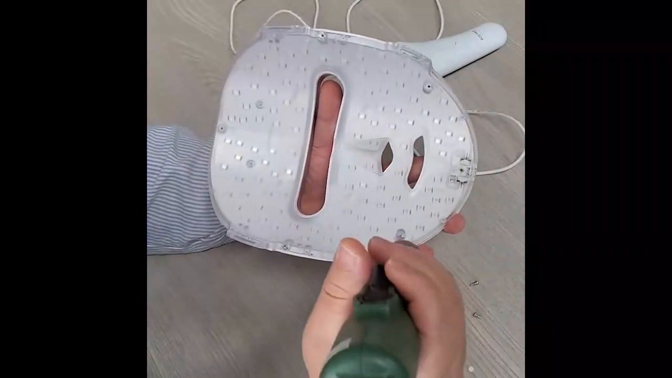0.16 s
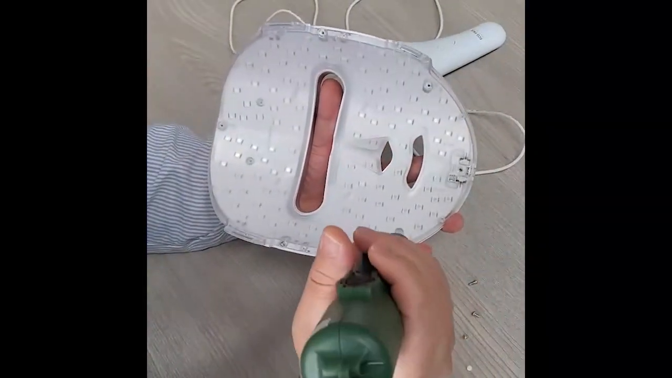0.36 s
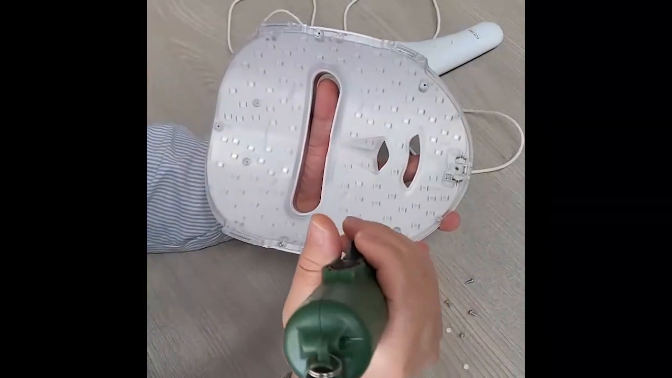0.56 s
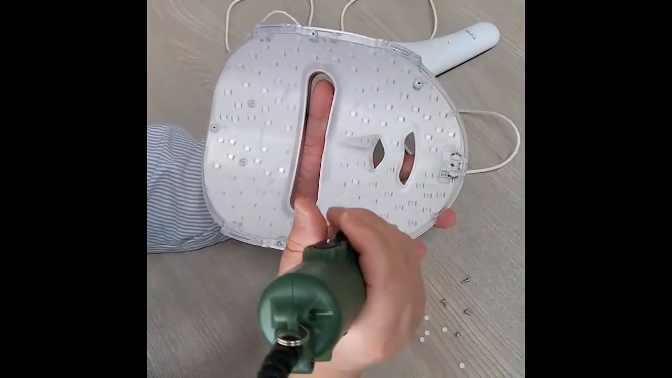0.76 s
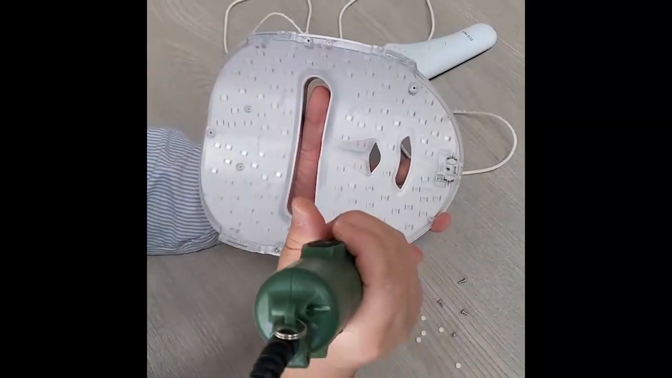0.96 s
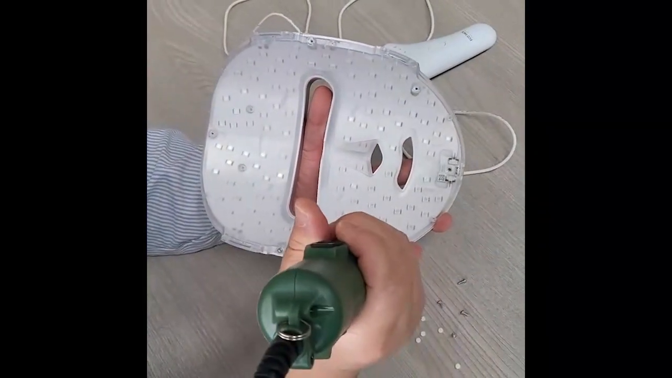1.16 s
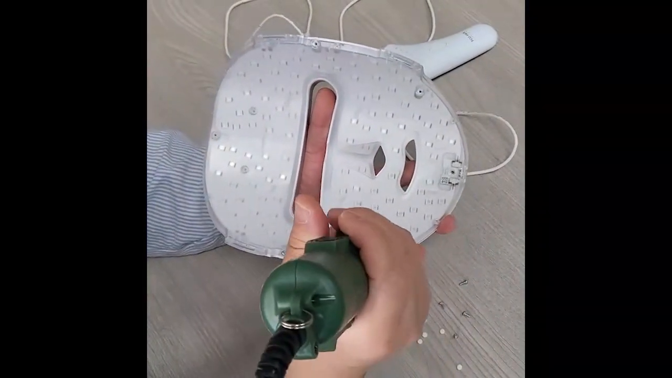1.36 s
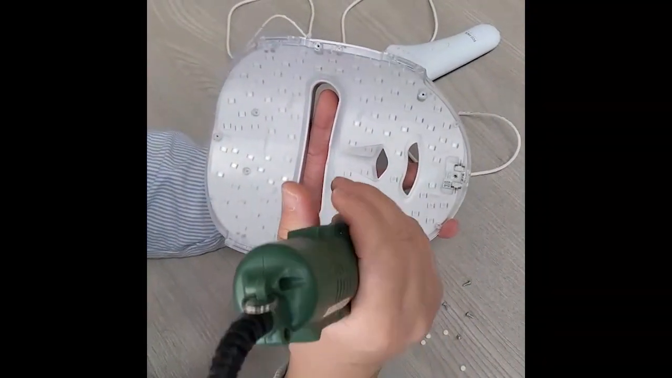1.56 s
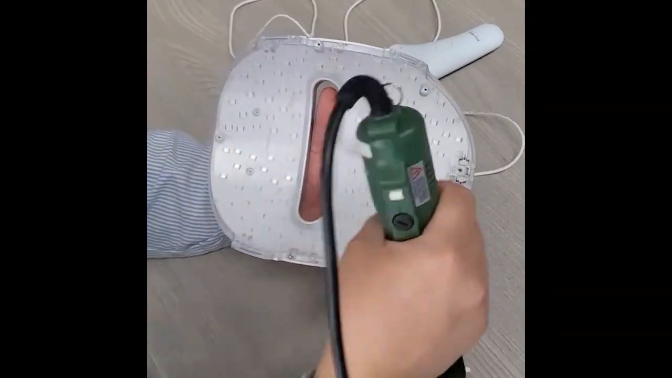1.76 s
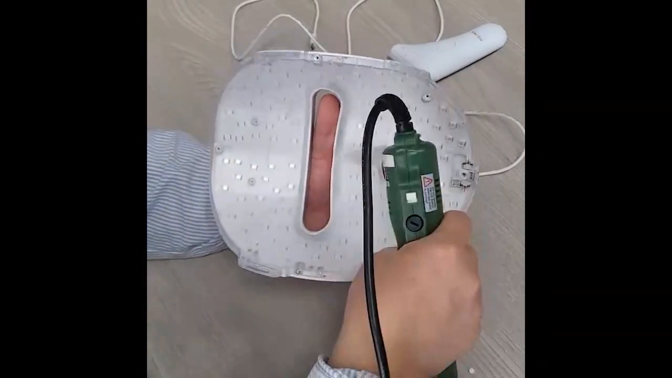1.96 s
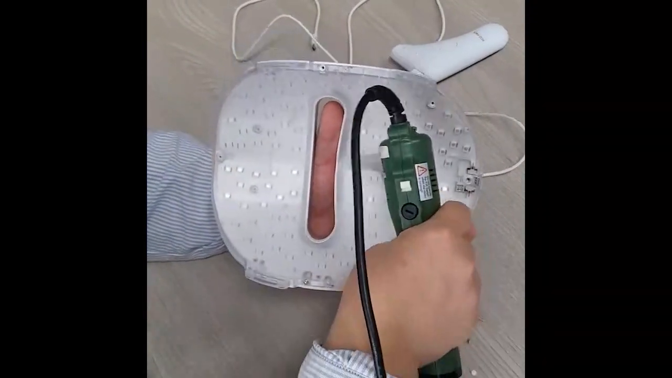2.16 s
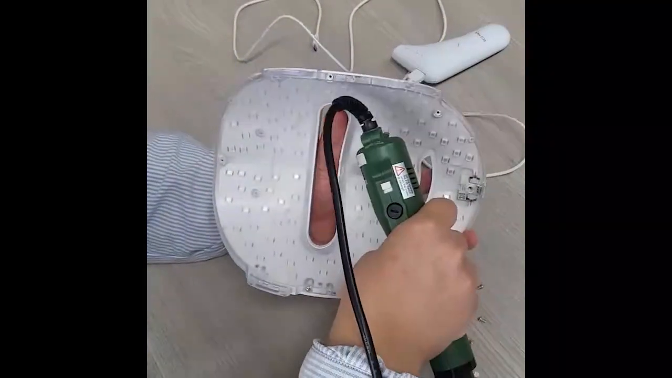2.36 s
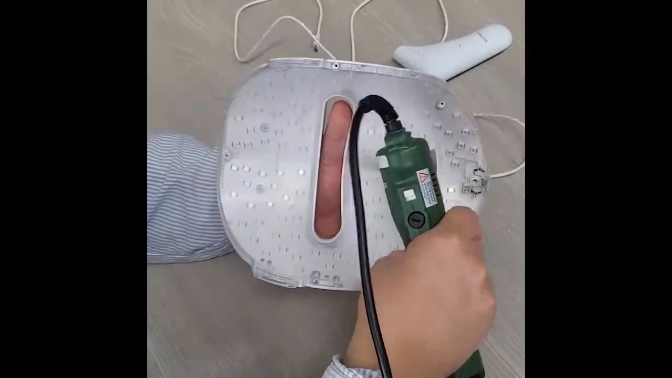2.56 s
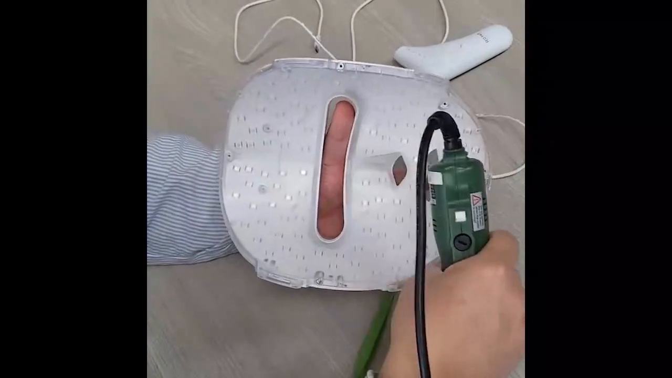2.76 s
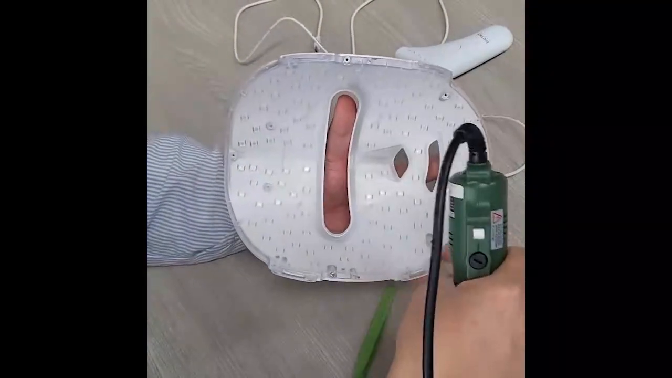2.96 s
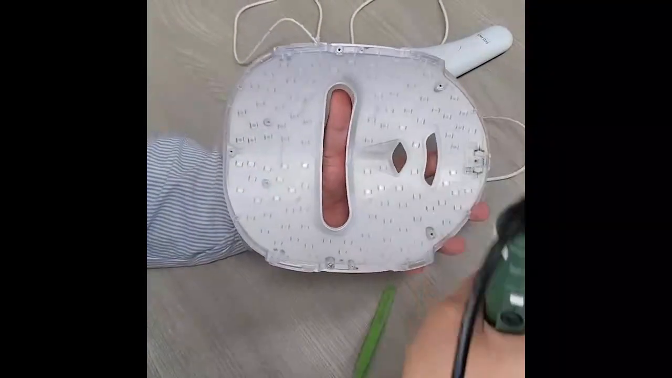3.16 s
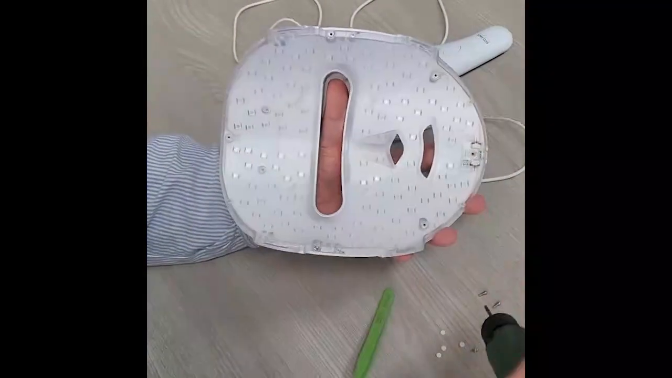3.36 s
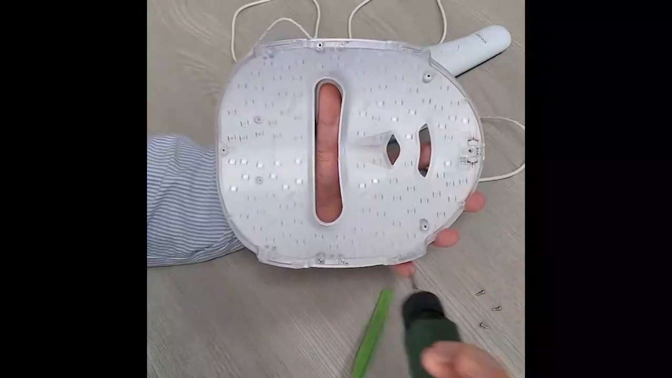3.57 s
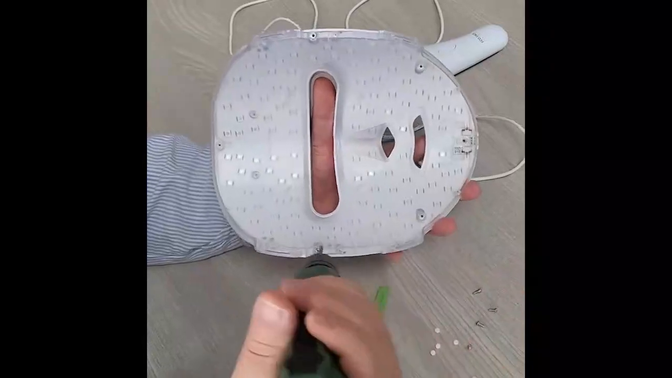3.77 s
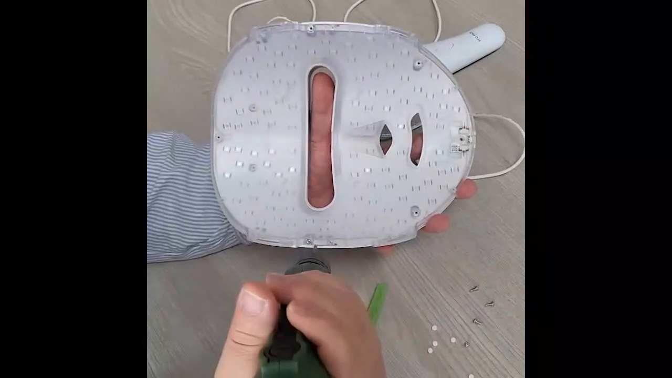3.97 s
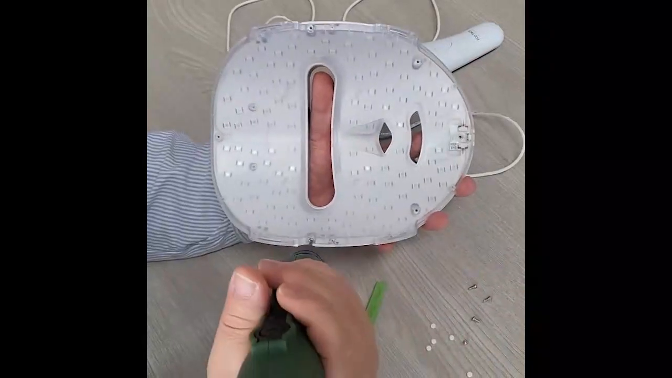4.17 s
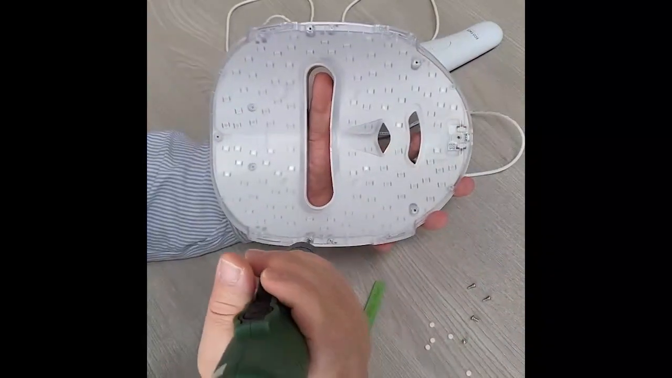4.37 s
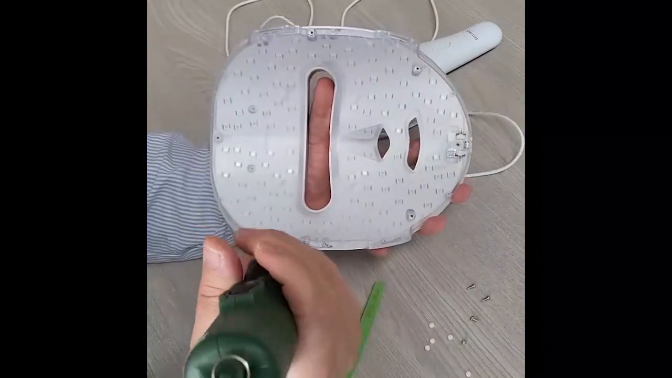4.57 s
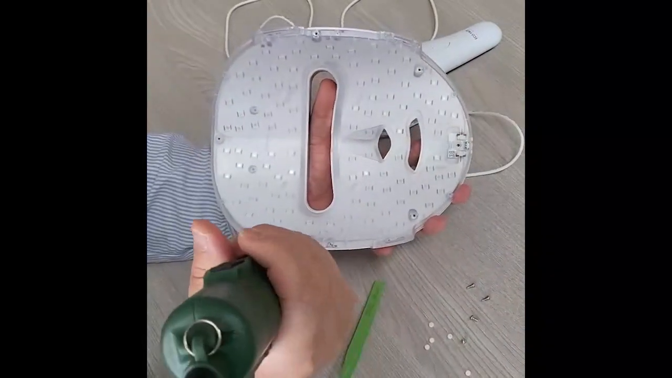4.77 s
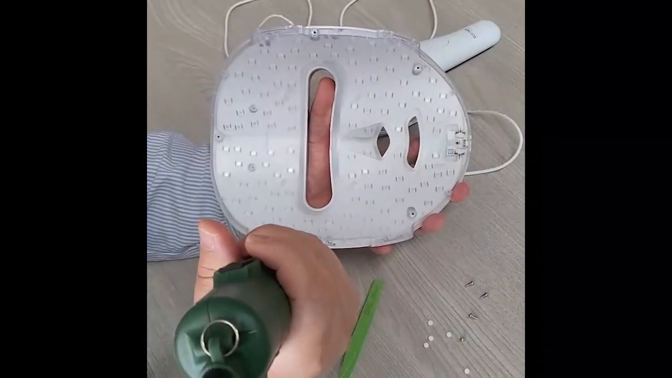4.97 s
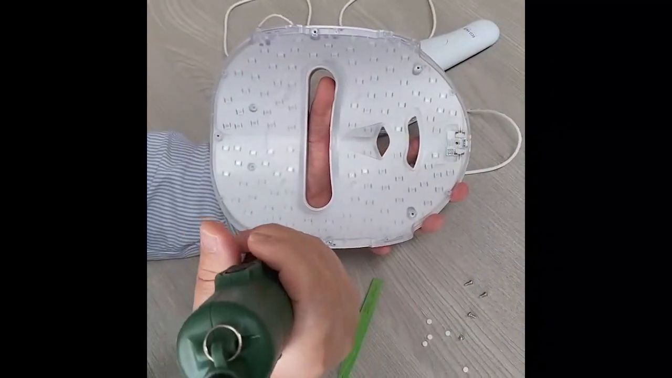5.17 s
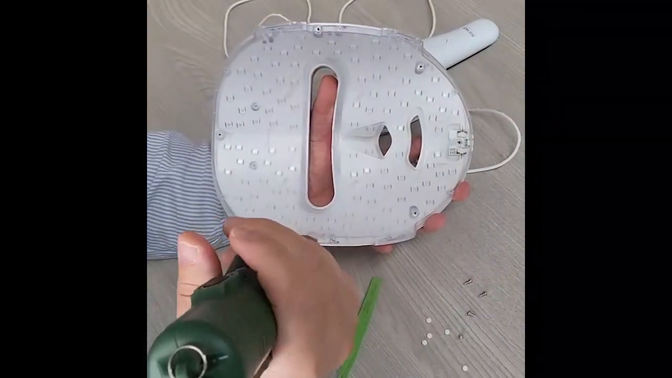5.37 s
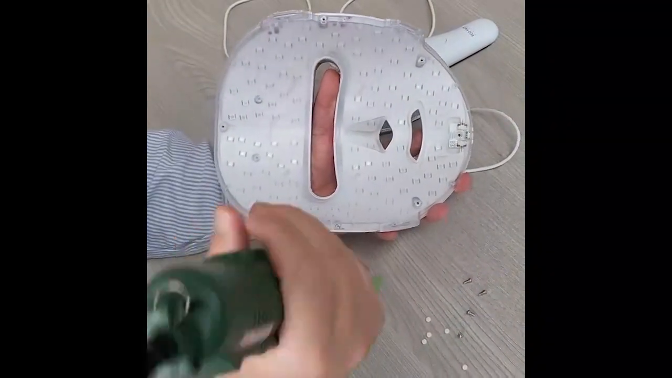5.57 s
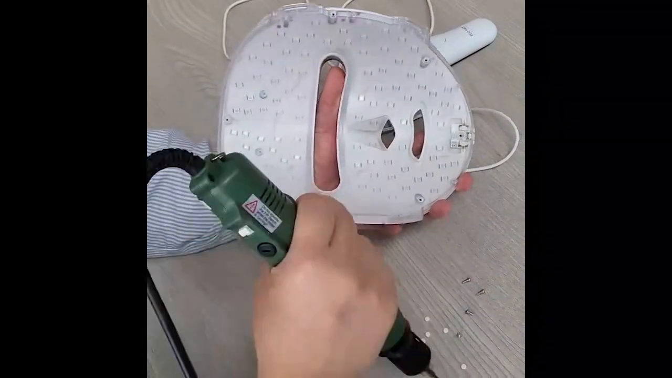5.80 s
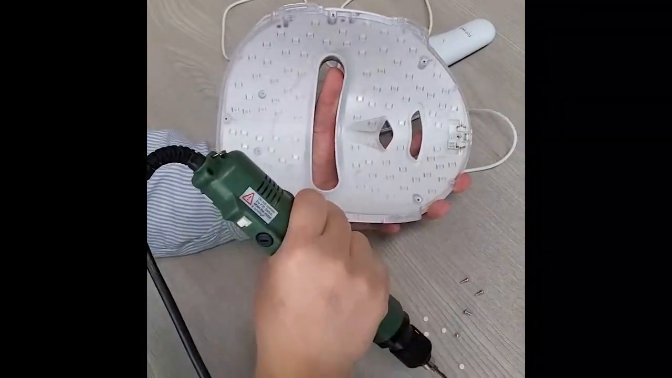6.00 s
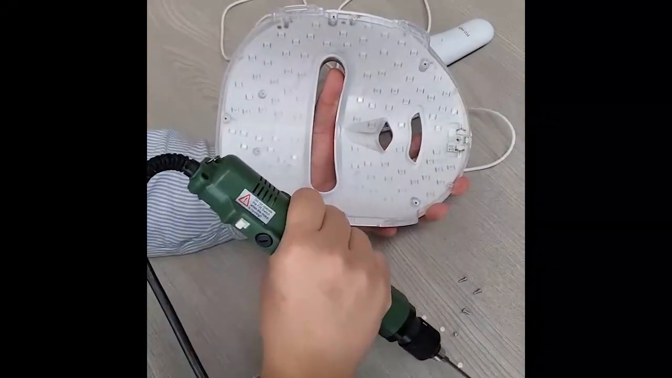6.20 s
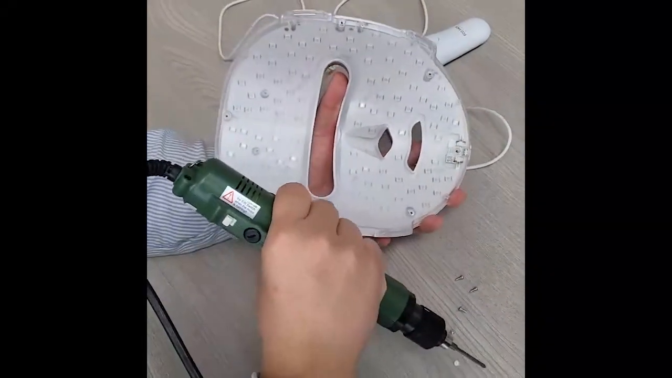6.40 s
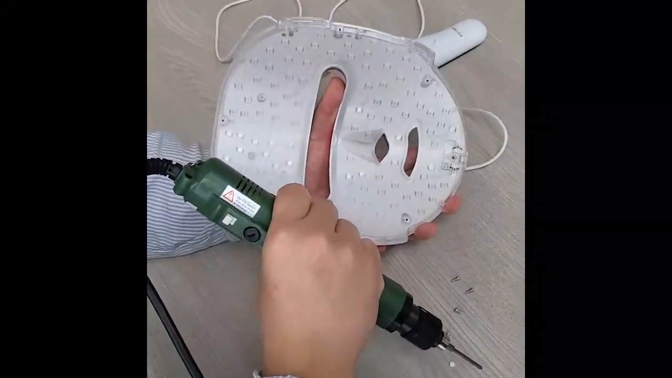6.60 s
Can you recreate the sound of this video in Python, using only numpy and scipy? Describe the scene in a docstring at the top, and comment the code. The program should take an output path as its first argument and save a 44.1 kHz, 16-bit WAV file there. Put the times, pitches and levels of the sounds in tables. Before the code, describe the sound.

Light taps on a hollow plastic shell, two brief power screwdriver runs that each start with a knock, and handling noise between.

```python
"""Close to the microphone, on a table in a small room with a low, beating hum: a hollow plastic mask.
The bit of a small corded screwdriver taps about for a screw head, ringing the shell. At 1 s the motor
kicks the screw loose with a knock, whines up to speed and coasts down. Tool and cord click and drag
over the mask, and the bit taps for a second screw. Near 5 s that one is backed out too, over a faint
squeak; the motor runs down and a last soft rub and click follow."""
import sys
import numpy as np
from scipy import signal
from scipy.fft import rfft, irfft, next_fast_len
from scipy.io import wavfile
from scipy.ndimage import uniform_filter1d, map_coordinates

SR = 44100
rng = np.random.default_rng(int(sys.argv[2]) if len(sys.argv) > 2 else 0)


def generate_wav(sig):
    """Save sig (samples, or channels by samples) to the path in sys.argv[1] as 16-bit PCM at SR."""
    pcm = np.round(np.clip(np.atleast_2d(sig).T, -1, 1) * 32767).astype(np.int16)
    wavfile.write(sys.argv[1], SR, pcm)


N = 292824
TIME = np.arange(N) / SR
BARS = 12  # on the motor's commutator


def amp(db):
    """Decibels to gain."""
    return 10 ** (np.asarray(db) / 20)


def unit(x):
    """x at rms 1."""
    return x / np.sqrt(np.mean(x ** 2) + 1e-20)


def along(points, hz):
    """(f/Hz, value) points read on a log axis."""
    f, v = np.transpose(points)
    return np.interp(np.log(hz + 1), np.log(f + 1), v)


def wobble(rate):
    """A smooth random curve, rate knots a second."""
    return map_coordinates(rng.standard_normal(int(N * rate / SR) + 4), [TIME * rate])


def filtered(x, response):
    """x times a response of frequency."""
    n = x.shape[-1]
    m = next_fast_len(n + 8192)
    return irfft(rfft(x, m) * response(np.fft.rfftfreq(m, 1 / SR)), m)[..., :n]


def coloured(x, spectrum, size=2048):
    """x through a minimum-phase filter with the (f/Hz, level/dB) shape, at rms 1."""
    cepstrum = irfft(np.log(amp(along(spectrum, np.fft.rfftfreq(size, 1 / SR)))))
    cepstrum[1:size // 2] *= 2
    cepstrum[size // 2 + 1:] = 0
    impulse = irfft(np.exp(rfft(cepstrum)))
    return unit(signal.fftconvolve(np.atleast_2d(x), impulse[None], axes=1)[:, :x.shape[-1]])


def grains(rate, spread_db):
    """Tiny impacts of uneven size, rate a second."""
    hits = rng.random(N) < rate / SR
    return unit(hits * rng.standard_normal(N) * amp(spread_db * rng.standard_normal(N)))


def burst(colour, rise, t60):
    """Stereo noise that starts sharply and dies at once."""
    t = np.arange(SR // 2) / SR
    envelope = (1 - np.exp(-t / rise)) * amp(-60 * t / t60)
    noise = coloured(rng.standard_normal((2, len(t))) * envelope, colour)
    return noise * np.sqrt(np.mean(envelope ** 2))


def swell(s, rise, t60):
    """An envelope that builds for rise seconds up to time s and then dies away."""
    return np.clip(1 + (TIME - s) / rise, 0, 1) ** 2 * amp(-60 * np.maximum(TIME - s, 0) / t60)


def patchy(x, depth_db):
    """The colour of x flickers in small patches of time and frequency."""
    z = signal.stft(x, nperseg=512)[2]
    field = uniform_filter1d(rng.standard_normal(z.shape[-2:]), size=6, axis=0)
    field = uniform_filter1d(field, size=7, axis=1)
    return signal.istft(z * amp(depth_db * unit(field)), nperseg=512)[1][..., :N]


def add(track, s, sound):
    """Mix a stereo sound into the track at time s."""
    part = track[:, max(round(s * SR), 0):][:, :sound.shape[1]]
    part += sound[:, :part.shape[1]]


def in_room(x, wet_db, pan_db, lead_s=.0001, early_db=-3, early_t60=0.21, shared=0.31):
    """x at a close microphone pair, with quick reflections off table and hands and the room's tail."""
    # the small room's decay: f/Hz, t60/s
    room = [(200, 0.52), (530, 0.24), (1300, 0.24), (3700, 0.17), (8000, 0.3), (15000, 0.049)]
    hz, t, noise = signal.stft(rng.standard_normal((3, SR // 2)), SR, nperseg=256)
    decay = amp(-60 * t / along(room, hz)[:, None]) + amp(early_db - 60 * t / early_t60)
    tails = signal.istft(noise * decay, SR, nperseg=256)[1]
    tails *= 1 - np.exp(-np.arange(tails.shape[1]) / SR / 0.00069)
    tails = tails[:2] + shared * tails[2]
    tails /= np.linalg.norm(tails, axis=1, keepdims=True)
    sides = np.array([[1], [-1]])
    direct = filtered(x, lambda f: np.exp(1j * np.pi * f * lead_s * sides))  # reaches the left first
    echo = signal.fftconvolve(np.atleast_2d(x), tails, axes=1)[:, :x.shape[-1]]
    return amp(sides * pan_db / 2) * (direct + amp(wet_db) * echo)


def room_tone(noise_db=-66, hum_pan_db=-2):
    """Faint, steady background noise, and a low hum whose close tones beat."""
    # spectrum of the background noise: f/Hz, level/dB
    noise_colour = [(12, -63), (20, -35), (41, -10.5), (65, -10.5), (88, -25.5), (119, -12), (145, -21.5),
                    (233, -23.5), (375, -34.5), (443, -32.5), (496, -49.5), (637, -37), (733, -44.5),
                    (10100, -48), (15800, -58.5)]
    # how alike the background noise is at left and right: f/Hz, likeness
    likeness = [(60, 0.59), (180, 0.66), (550, 0.22), (1650, 0.08), (4970, 0.44), (15000, 1)]
    # tones of the hum: f/Hz, level/dB
    hum_tones = [(61, -59.5), (47.5, -67), (60, -82), (126.4, -73.5)]

    def mid_and_side(hz):
        width = np.arccos(np.clip(along(likeness, hz), 0, 1)) / 2
        return amp(along(noise_colour, hz)) * [np.cos(width), np.sin(width)]

    mid, side = filtered(rng.standard_normal((2, N)), mid_and_side)
    noise = amp(noise_db) * unit(np.array([mid + side, mid - side]))
    hum = sum(amp(db + 0.32 * wobble(1)) * np.sin(2 * np.pi * hz * TIME + .5 * wobble(15))
              for hz, db in hum_tones)
    return noise + hum * amp([[hum_pan_db / 2], [-hum_pan_db / 2]])


def clicks():
    """Small hard parts of switch and cord snap with a bright tick and almost no ring."""
    # the snaps: t/s, level/dB, clack below 2.3 kHz/dB, fizz above 10 kHz/dB, left-right/dB
    snaps = [(0.026, -33, 2, -5, -2.5), (.979, -26.5, -7, -5, 3), (1.992, -29, -6.5, -6.5, 0),
             (2.696, -20.5, 3.5, -4, -1.5), (2.857, -17, -16, 5, 1.5), (3.021, -19, -25, 6, 1),
             (3.125, -24.5, -7, 4, -2), (3.216, -28, -31, 6, -1), (3.572, -44, 9, -5, -6.5),
             (4.907, -27, -1.5, -7, -1.5), (4.923, -22.5, -1, -21, -1), (6.196, -50.5, 9.5, -13, -0.5)]
    # spectrum of a snap: f/Hz, level/dB
    snap_colour = [(200, -18), (750, -6.5), (1400, -1), (2300, 4.5), (3400, -3.5), (7000, -0.5),
                   (10500, -5), (15000, -9.5)]
    out = np.zeros((2, N))
    for s, db, clack_db, fizz_db, pan_db in snaps:
        tilt = [(2300, clack_db), (3400, 0), (7000, 0), (10500, fizz_db)]
        colour = [(hz, level + along(tilt, hz)) for hz, level in snap_colour]
        tick = amp(db) * burst(colour, rise=0.00094, t60=0.0091)
        add(out, s, in_room(tick, wet_db=2, pan_db=pan_db))
    return out


def shell_taps(ring_rise_s=0.00011):
    """Bit and tool ring the mask briefly; each tap has its own brightness and crack."""
    # the blows: t/s, ring/dB, low modes re ring/dB, high modes re ring/dB, crack/dB, left-right/dB
    blows = [(.153, -42.5, -13.5, 0.5, -55, 1), (0.172, -24.5, -4.5, -0.5, -45, -1.5),
             (.178, -18.5, -5, -2.5, -32, -1), (.238, -34.5, -8, -3, -63, -4),
             (.327, -53.5, -12, 6.5, -69, -3), (.545, -39, -12, 3.5, -46, 0.5),
             (.582, -28.5, -10.5, 0.5, -47, -3.5), (.591, -28.5, -11.5, -2, -48, 0),
             (0.636, -42.5, -5.5, 1.5, -55, 0.5), (.668, -31.5, -5, -5, -44.5, -2.5),
             (0.77, -50.5, -6, -9, -63.5, 0), (1.011, -12, -23.5, 4, -14, 0),
             (1.373, -26, -3.5, 2, -45, -2), (1.438, -27.5, -5, -1, -32, -1.5),
             (4.015, -24, -11, -7, -61.5, -5.5), (4.025, -30.5, 2, 0.5, -40.5, -1.5),
             (4.283, -27.5, -9.5, -2.5, -43, -1.5), (4.405, -8.5, -23.5, -9.5, -30, -1),
             (4.521, -46, -3, -2.5, -57.5, -2), (4.748, -60, -6, 1, -72, -14),
             (4.944, -6.5, -9, -1, -26.5, -4.5), (4.951, -13, -15.5, 7, -12.5, 0.5),
             (5.355, -29, -3.5, -15, -30, -1)]
    # modes of the plastic shell: f/Hz, level/dB, t60/s
    shell = [(202, -19.5, 0.031), (275, -13.5, 0.028), (428, -3, 0.02), (556, -2, 0.024),
             (671.5, -3.5, .02), (894, 2, .018), (985, 6, 0.0077), (1245, 1.5, 0.012), (1530, -1.5, 0.014),
             (1580, 2, 0.011), (1874, -3, 0.0074), (2195, -2.5, 0.014), (2520, -9, 0.017),
             (3100, -10.5, 0.0069), (3830, -17.5, 0.015)]
    # spectrum of the contact's crack: f/Hz, level/dB
    crack_colour = [(1530, -32.5), (2600, -4.5), (3160, -7), (5050, -6), (5910, -9.5), (6970, -5.5),
                    (8530, -18), (11400, -21), (15500, -24)]
    out, t = np.zeros((2, N)), np.arange(SR // 2) / SR
    hz, mode_db, t60 = np.transpose(shell)[:, :, None]
    polarity = (-1) ** np.arange(len(hz))[:, None]
    for s, ring_db, low_db, high_db, crack_db, pan_db in blows:
        tilt = [(600, low_db), (950, 0), (1280, 0.0073), (1600, high_db)]
        strike_db = along(tilt, hz) + rng.normal(0, 1, hz.shape)
        pitch = hz * (1 + rng.normal(0, 0.036, hz.shape))  # the grip bends the shell a little
        modes = polarity * amp(mode_db + strike_db - 60 * t / t60) * np.sin(2 * np.pi * pitch * t)
        ring = amp(ring_db) * (1 - np.exp(-t / ring_rise_s)) * modes.sum(axis=0)
        crack = amp(crack_db) * burst(crack_colour, rise=0.00038, t60=.017)
        wet_db = np.interp(ring_db, [-25, -7], [-2.5, -9])  # loud blows face the microphone: drier
        add(out, s, in_room(ring, wet_db, pan_db) + in_room(crack, wet_db=-0.5, pan_db=pan_db))
    return out


def shaft_speed(on, off, tight_hz, top_hz, spin_up_s=.034, loosen_s=.15, coast_s=.75, friction_hz_s=1056):
    """Turns a second: quick spin-up, a slow gain as the screw loosens, then drag and dry friction."""
    driven, free = np.clip(TIME, on, off) - on, np.maximum(TIME - off, 0)
    speed = tight_hz * (1 - np.exp(-driven / spin_up_s))
    speed += (top_hz - tight_hz) * (1 - np.exp(-driven / loosen_s))
    drag = np.exp(-free / coast_s)
    return np.maximum(speed * drag - friction_hz_s * coast_s * (1 - drag), 0)


def brushes(angle, once_a_turn, hiss, sizzle, rasp_db=2.5):
    """Brushes hiss over the commutator's bars; their sparks sizzle above about 8 kHz."""
    # spectrum of the sliding contact: f/Hz, level/dB
    brush_colour = [(1650, -31), (2800, -4), (3080, -9.5), (4260, -8), (4750, -2.5), (5260, -7), (5650, -5),
                    (6630, -2), (7280, -2.5), (8290, -11), (11200, -1), (13700, -5), (14500, -1),
                    (15500, -9), (15800, -28)]
    contact = once_a_turn * (1 + .5 * np.cos(BARS * angle)) * amp(rasp_db * wobble(220))
    noise = coloured(contact * (rng.standard_normal((2, N)) + grains(4000, spread_db=-2)), brush_colour)
    sparks = filtered(noise, lambda f: np.clip((f - 7800) / 1200, 0, 1))
    return hiss * unit(noise - sparks) + sizzle * unit(sparks)


def gear_rattle(once_a_turn, slack):
    """The gears rattle in their casing; the deep part needs speed or load and fades as they go slack."""
    # spectrum of the gears: f/Hz, level/dB
    gear_colour = [(410, -34), (700, -9), (765, -11), (1000, -2), (1370, -0.5), (1790, -4.5), (2080, 0.5),
                   (3010, -15), (3600, -5.5), (4680, -39.5), (7920, -120)]
    rattle = coloured(once_a_turn * grains(5000, spread_db=2), gear_colour)
    casing = filtered(rattle, lambda f: np.clip((1200 - f) / 200, 0, 1))
    return rattle - slack * casing


def screw_grind(torque, speed_ratio, loosest_s, bite_db=10.5, half_width_s=0.15, uneven_db=3.5):
    """The screw bites in its thread under torque, then grinds again as it wobbles loose."""
    # spectrum of the thread: f/Hz, level/dB
    thread_colour = [(65, -37.5), (110, -6), (189, -12.5), (269, -3), (485, -6.5), (679, -3), (793, -7.5),
                     (1100, -3.5), (1430, -33.5), (2420, -120)]
    bite = amp(bite_db) * torque ** 2
    loose = speed_ratio ** 2 / (1 + ((TIME - loosest_s) / half_width_s) ** 2)
    thread = coloured(grains(1200, spread_db=2), thread_colour)
    return (bite + loose) * amp(uneven_db * wobble(35)) * thread


def motor_whine(speed, angle, coasting):
    """Tones at multiples of the shaft speed; those above the commutator's soften as the shaft slows."""
    # motor tones: multiple of the shaft speed, level under power/dB, level coasting/dB
    orders = [(1.45, 1, -20), (2.9, -9, -25), (3, -16, -9), (4.35, -7, -25), (6, -19, -12), (12, -.5, 2.5),
              (13, -14, -18), (24, -8, -6), (36, -40, -5)]
    # how well the housing radiates them: f/Hz, gain/dB
    housing = [(400, -24), (900, -14), (1300, -4), (2500, -4), (4000, 0), (5500, 1), (7000, 2), (8500, -10),
               (10500, 0), (12500, -2), (15000, -12), (17000, -60)]
    softening_db = 1.4 * np.clip(speed / 210 - 1, -1, 0)
    whine = np.zeros(N)
    for order, driven_db, free_db in orders:
        db = driven_db + (free_db - driven_db) * coasting
        db += along(housing, order * speed) + softening_db * max(order - BARS, 0)
        whine += amp(db + wobble(25)) * np.sin(order * angle)
    return whine


def screwdriver(run, levels, chop=0.31, flutter_db=1.86, attack_s=0.033, quiet_below_hz=126):
    """One run, close up: brushes, gears, screw and whine follow the shaft's speed and load."""
    on, off, _, top_hz = run
    hiss_db, sizzle_db, gear_db, thread_db, loosest_s, pan_db = levels
    speed = shaft_speed(*run)
    speed_ratio = speed / top_hz
    coasting = np.clip((TIME - off) / 0.034, 0, 1)
    torque = (1 - speed_ratio) * (1 - coasting)  # greatest at the start, gone at full speed
    attack = np.clip((TIME - on) / attack_s, 0, 1) ** 2
    pace = (speed / quiet_below_hz) ** 5.1  # the noise fades steeply at low speed
    running = attack * pace / np.hypot(1, pace) * amp(flutter_db * wobble(25))
    blur = (.005 + .009 * coasting) * wobble(300)  # without drive the gears run slack and tones blur
    angle = 2 * np.pi * np.cumsum(speed * (1 + blur)) / SR
    once_a_turn = 1 + chop * np.cos(angle)

    def gain(db, torque_db, coast_db):
        return running * amp(db + torque_db * torque + coast_db * coasting)

    hiss = gain(hiss_db, torque_db=9.5, coast_db=-5.5)
    sizzle = gain(sizzle_db, torque_db=7, coast_db=-5.5)
    gears = gain(gear_db, torque_db=19, coast_db=-4.5)
    noise = brushes(angle, once_a_turn, hiss, sizzle)
    noise += gears * gear_rattle(once_a_turn, slack=coasting * (1 - speed_ratio ** 3))
    noise += running * amp(thread_db) * screw_grind(torque, speed_ratio, loosest_s)
    whine = hiss * (1 - torque) ** 2 * motor_whine(speed, angle, coasting)
    whine = in_room(whine, wet_db=-5.5, pan_db=pan_db, lead_s=.00003)
    noise = in_room(noise, wet_db=-1, pan_db=pan_db, lead_s=.00003)
    return whine + patchy(noise, depth_db=2.8)


def handling():
    """A little to the right, cord and tool bump the hollow shell and stick and slip across it."""
    # slides over the mask: peak t/s, rise/s, t60/s, bump/dB, rub/dB, scrape/dB
    slides = [(2.36, 0.03, 0.16, -66, -65, -73.5), (2.461, 0.016, 0.18, -72, -80, -78.5),
              (2.88, 0.028, 0.2, -40.5, -45.5, -39), (2.934, 0.1, 0.41, -36, -56.5, -69),
              (3.025, 0.017, .4, -50, -60.5, -49), (3.11, 0.035, 0.2, -60.5, -64, -54.5),
              (3.287, 0.12, 0.21, -42.5, -58, -46.5), (3.33, 0.09, 0.12, -61, -62.5, -55),
              (3.49, 0.15, 0.53, -70.5, -71.5, -69), (3.61, 0.081, 0.3, -68.5, -65.5, -70),
              (3.78, 0.024, 0.37, -60.5, -89, -105), (4.167, .018, 0.23, -63.5, -50.5, -73),
              (4.205, .06, 0.16, -69, -53.5, -88), (5.939, 0.075, 0.26, -68, -68, -74.5),
              (6.265, 0.019, 0.29, -62.5, -69.5, -70.5)]
    # spectra of the deep bump, the dull rub and the bright scrape: f/Hz, level/dB
    bump_colour = [(41, -34.5), (80, -14), (114, 3.5), (162, -0.5), (188, -10.5), (284, -4.5), (356, -10),
                   (520, -47.5), (680, -54), (1140, -120)]
    rub_colour = [(200, -26.5), (400, 8), (700, 5), (1000, 0), (1600, -8), (3000, -69.5)]
    scrape_colour = [(600, -71), (1200, 1.5), (1600, -0.5), (2300, -1.5), (3000, -9), (7000, -9),
                     (14000, -33)]
    bump, rub, scrape = sum(amp(db)[:, None] * swell(s, rise, t60) for s, rise, t60, *db in slides)
    bumps = bump * coloured(grains(1500, spread_db=1), bump_colour)
    slips = rub * coloured(grains(2000, spread_db=2), rub_colour)
    scratches = scrape * coloured(grains(3000, spread_db=2.5), scrape_colour)
    return in_room(bumps, wet_db=-12, pan_db=-2.5) + in_room(slips + scratches, wet_db=-3, pan_db=-3.5)


def squeak(hz=1590):
    """A faint, wavering squeak, a little to the left, as the second run starts."""
    # the squeak's swell: peak t/s, rise/s, t60/s, level/dB
    shape = (5, 0.2, 0.8, -73)
    s, rise, t60, db = shape
    tone = amp(db) * swell(s, rise, t60) * np.sin(2 * np.pi * hz * TIME + wobble(60))
    return in_room(tone, wet_db=-4.5, pan_db=2.5)


def scene():
    """Two screws come out at the table, with the handling and the room around them."""
    # the motor's runs: on t/s, off t/s, shaft against the tight screw f/Hz, shaft at top speed f/Hz
    runs = [(.972, 1.536, 398.7, 491.8), (4.906, 5.347, 416.2, 489.9)]
    # each run's mix: hiss/dB, sizzle/dB, gears/dB, thread/dB, screw wobbles most t/s, left-right/dB
    run_levels = [(-40, -37.5, -47, -48, 1.41, 0), (-36, -33, -43, -48.5, 5.35, 1)]
    tool = sum(screwdriver(run, levels) for run, levels in zip(runs, run_levels))
    return tool + shell_taps() + clicks() + handling() + squeak() + room_tone()


def record(dry, top_hz=15600):
    """The recorder keeps nothing above its band limit."""
    return filtered(dry, lambda hz: 1 / (1 + (hz / top_hz) ** 160))


dry = scene()
out = record(dry)
generate_wav(out)
```